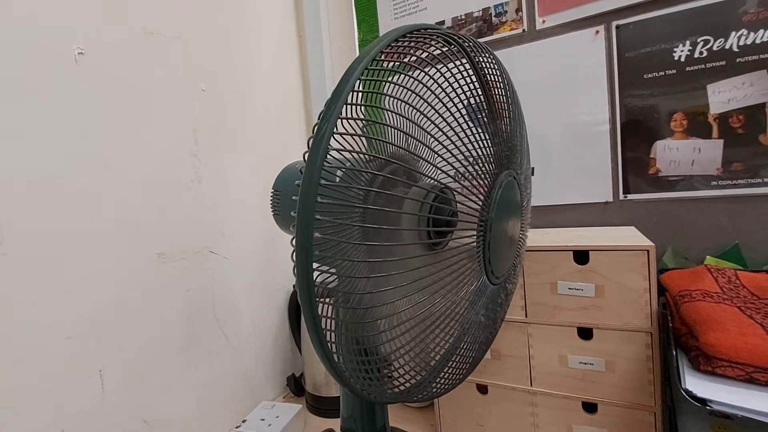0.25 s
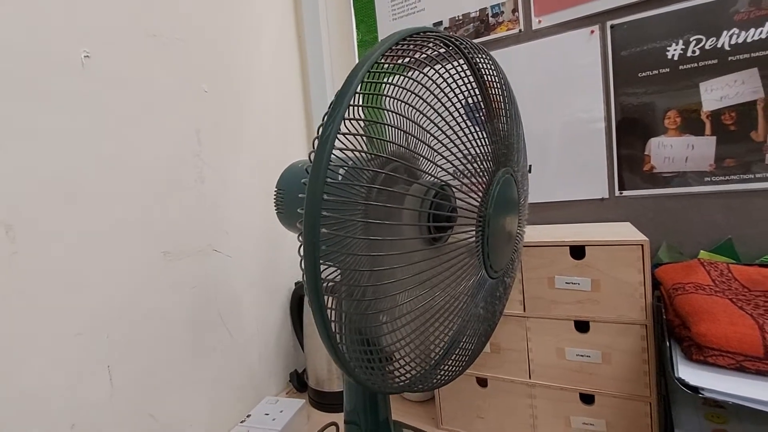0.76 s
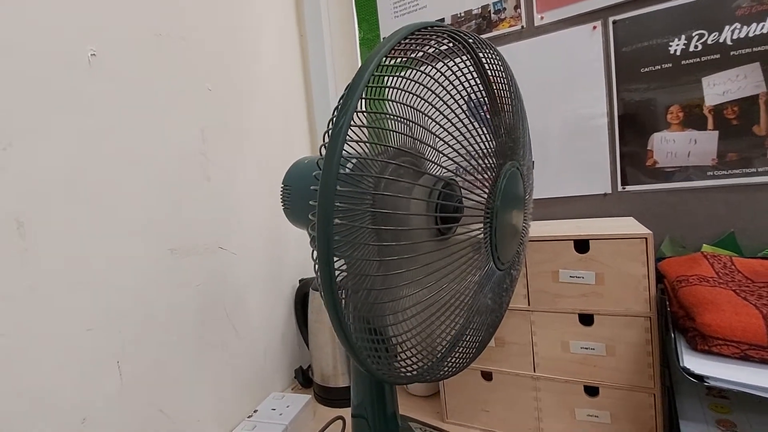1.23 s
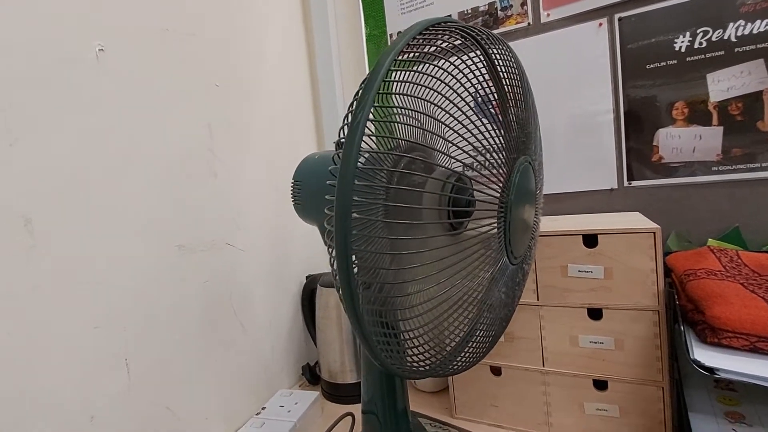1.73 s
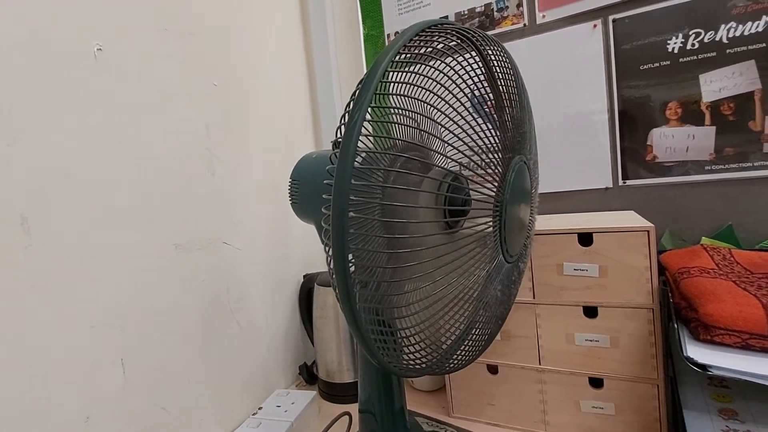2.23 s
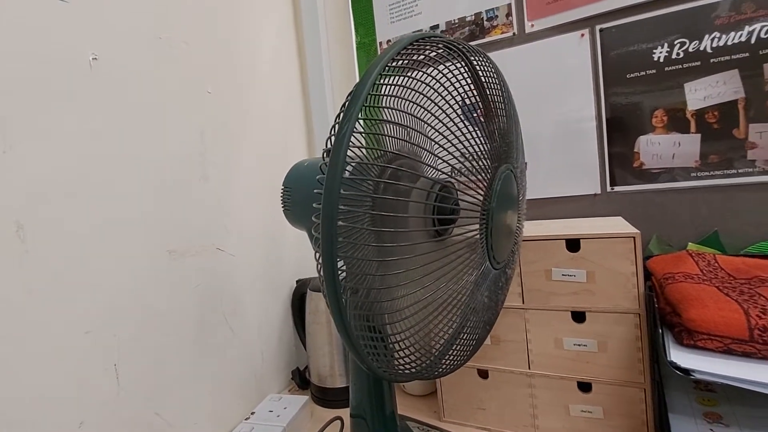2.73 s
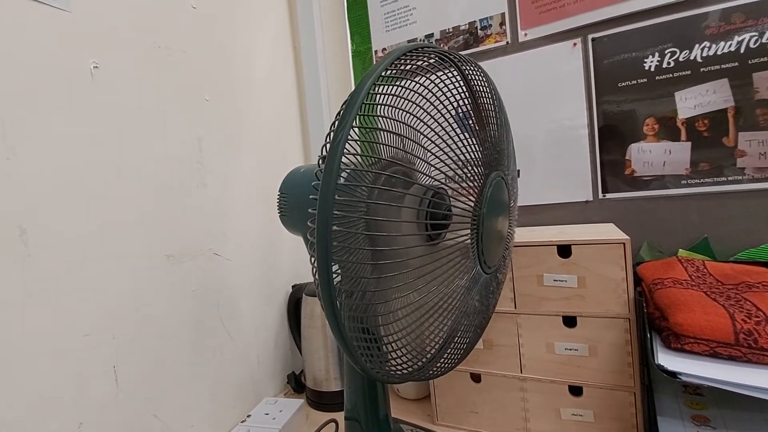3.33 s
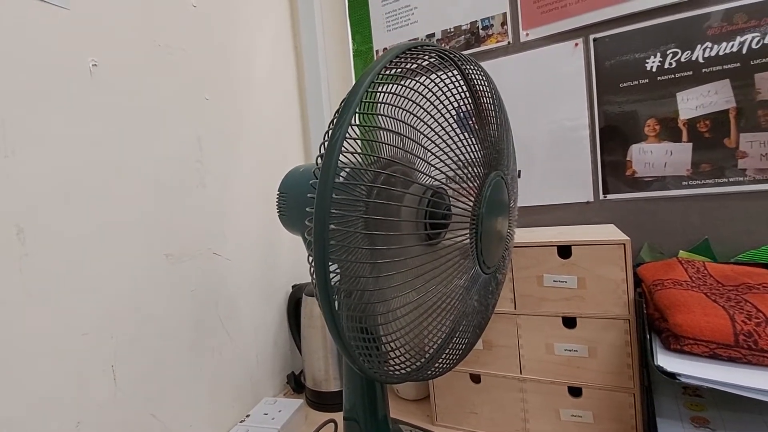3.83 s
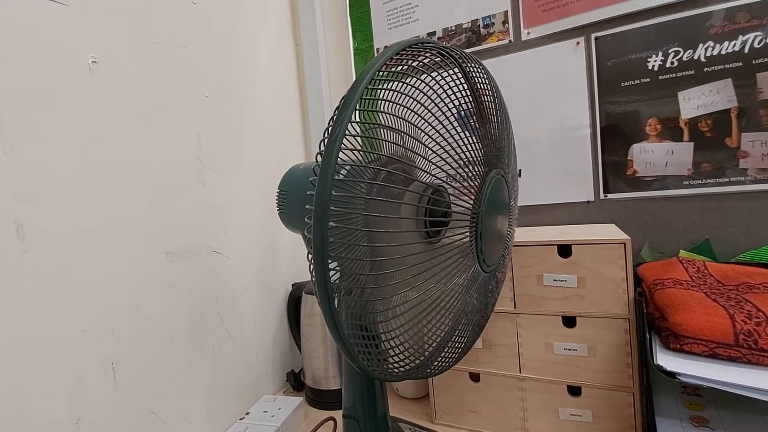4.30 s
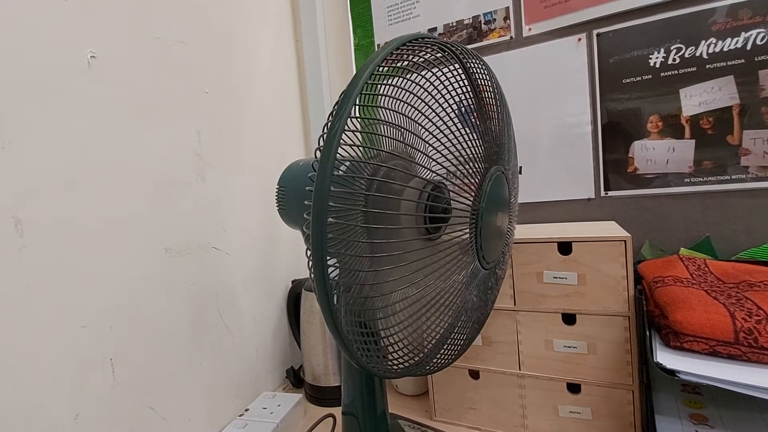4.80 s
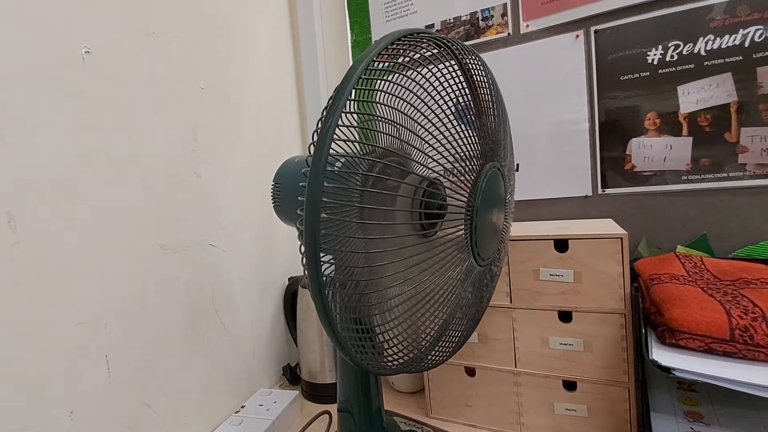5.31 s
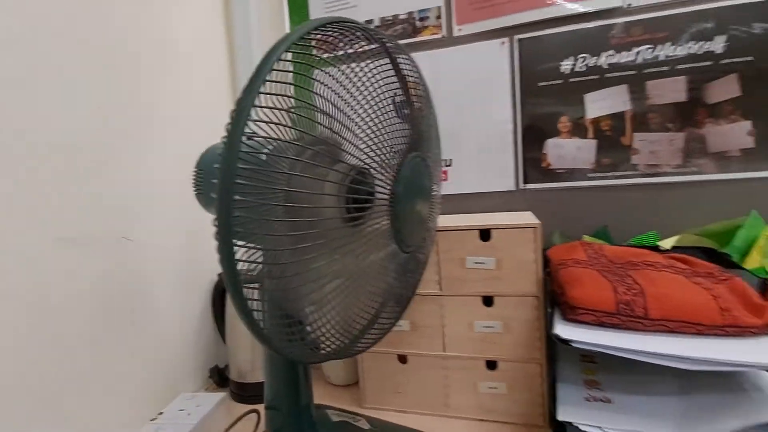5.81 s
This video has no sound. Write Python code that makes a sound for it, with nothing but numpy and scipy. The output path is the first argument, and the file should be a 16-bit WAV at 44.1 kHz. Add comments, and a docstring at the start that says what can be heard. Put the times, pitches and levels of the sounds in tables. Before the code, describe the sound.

A table fan runs continuously at high speed, close to a stereo microphone in a classroom. From 0 to 1 s the blade drone, motor hum, low boom and air rush swell from somewhat quieter to full level. The drone is deep, near 60 Hz with wavering overtones up to about 240 Hz, over a steady 100 Hz hum. Irregular soft bass surges near 90 Hz crowd roughly 0.8 to 2.8 s, then return at about 3.8 s and more weakly until 5 s. Over this lies an even, breathy rush through the wire guard, strongest in the low mids and up to 2 kHz, with gentle treble, faint whistles and slight flutter. The drone steps forward near 1.4 s, dips around 3 s, rises near 4 s, settles, then rises again near 5.9 s as the rush eases by 6 s. The fan never stops.

```python
"""A three-bladed table fan runs at high speed in a classroom, heard close up in stereo.
Drone, hum, boom and rush swell in during the first second; low surges crowd the first three seconds.
Then the fan runs on, its blade drone leaning forward near 1.4 s, 4 s and the end as the rush eases.
Wavering tones make the blade drone, motor hum and faint whistles; a narrow tone swinging in level makes
the boom; coloured noise makes the flutter of the wake and the rush through the wire guard."""
import sys
import numpy as np
from scipy import signal
from scipy.fft import irfft
from scipy.io import wavfile

SR = 44100
rng = np.random.default_rng(int(sys.argv[2]) if len(sys.argv) > 2 else 0)


def dump(signal):
    """Clip the signal to [-1, 1] and save it as 16-bit WAV at the path in sys.argv[1]."""
    limited = np.clip(np.atleast_2d(signal).T, -1, 1)
    pcm = np.round(limited * 32767).astype(np.int16)
    wavfile.write(sys.argv[1], SR, pcm)


N = 266849
TIME = np.arange(N) / SR  # seconds
FREQS = np.fft.rfftfreq(N, 1 / SR)  # Hz

BLADE_HZ, MAINS_HZ, BOOM_HZ = 60.9, 50, 89.5
TREBLE_EDGE_HZ = 15720
SURGE_S = 0.039  # time a surge takes to fall to about a third of its peak
BOOM_DB = -47.5  # level of the boom between surges, once swelled in
LOW_START_DB, LOW_RISE_S = -8, 0.66  # boom and wake start this far down and rise evenly in dB
GUARD_FOLLOWS, BODY_FOLLOWS = 0.58, 0.76  # dB of swell for each dB of the hiss

# Motor hum. Each row: multiple of the mains frequency, level in dB before the rush curve.
MOTOR_HUM = [(2, -46.5), (4, -59.5)]
# Strongest surges of the low boom. Each row: time of the peak in seconds, peak level in dB.
BOOM_SURGES = [(0.79, -36), (0.93, -35.5), (1.17, -36.5), (1.31, -34), (1.48, -36), (1.78, -34.5),
               (2.03, -37.5), (2.21, -36), (2.43, -37), (2.82, -37), (3.78, -35.5), (4.16, -39.5),
               (4.5, -38), (4.85, -39), (5.01, -39.5)]
# Low resonances where the wake flutters. Each row: centre in Hz, width in Hz, relative level in dB.
WAKE_FLUTTER = [(78.8, 2.7, 5), (107.7, 3.4, 0), (191.6, 2.9, -9.5), (214.6, 15, -2), (227.1, 16, 1),
                (272.5, 12, -3), (305, 25, -9.5)]
# Faint narrow whistles of guard and motor. Each row: frequency in Hz, level in dB before the swell.
FAINT_WHISTLES = [(404.3, -67.5), (420.7, -67.5), (490.7, -67.5), (707.3, -66.5), (735.6, -71.5),
                  (914.6, -69)]
# Colour of the dull body of the rush. Each row: frequency in Hz, relative level in dB per Hz.
BODY_COLOUR = [(22, -9.5), (37, -18), (52, 3.5), (70, -11), (112, 3.5), (136, 1), (166, -3.5), (242, -11.5),
               (332, -6.5), (402, -8.5), (478, -13.5), (562, -24.5), (805, -17.5), (1490, -64)]
# Colour of the hiss of the rush. Each row: frequency in Hz, relative level in dB per Hz.
HISS_COLOUR = [(335, -24), (628, -4.4), (1302, -2.4), (1407, -8), (1532, -4), (2090, -5), (2500, -11.3),
               (2960, -16.2), (4100, -19.4), (5420, -22.5), (6220, -25.6), (7370, -26), (7870, -30.3),
               (11380, -30.5), (11920, -33.6), (15660, -37.8)]
# Broad and narrow resonances of the rush in the guard. Each row: centre in Hz, width in Hz,
# relative level in dB.
GUARD_RESONANCES = [(682, 186, 1), (1180, 170, -3.5), (1684, 200, -4), (1932, 23, -3), (1930, 79, -11.5)]
# Stereo balance. Each row: frequency in Hz, left minus right in dB.
STEREO_TILT = [(42, 10), (60.8, 8), (91, 0.7), (121, -3.5), (186, 9.5), (232, -2.5), (282, -4.5),
               (405, 0.7), (910, -1.7), (1160, -3.5), (1560, -6.5), (2020, -6.5), (3020, 1), (4600, -0.5),
               (6900, -2.5), (8100, -1)]
# Likeness of the two channels. Each row: frequency in Hz, correlation from -1 to 1.
STEREO_LIKENESS = [(62, .94), (310, .91), (525, .69), (790, .83), (1010, .31), (1235, .71), (1560, .02),
                   (1960, .55), (2620, .21), (3120, -.12), (6000, .01)]
# Swell of the rush about its usual level. Each row: time in seconds, level in dB.
RUSH_CURVE = [(0, -4), (0.25, -5), (0.72, -2.5), (0.93, -0.5), (1.45, 0.2), (1.9, -0.4), (2.75, 0.5),
              (3.15, -0.8), (4.0, 0), (5.65, 0), (6.05, -2)]
# Swell of the blade drone about its usual level. Each row: time in seconds, level in dB.
DRONE_CURVE = [(0, -12), (0.35, -4), (1.0, -0.5), (1.38, 3), (1.65, 0.5), (2.8, -1), (3.05, -2.5),
               (3.7, -1), (4.05, 3.5), (4.5, 0), (5.4, -0.5), (5.9, 2.5)]
# Blade drone. Each row: multiple of the blade rate, level in dB before the drone curve,
# line width in Hz, strength of the part scattered by eddies (steady part = 1).
BLADE_HARMONICS = [(1, -46.0, 7.8, 0.082), (2, -43.5, 3.8, 0.24), (3, -52, 2.7, 0.73),
                   (4, -49.5, 2.6, 0.58)]


def amp(db):
    """Decibels to gain."""
    return 10 ** (np.asarray(db) / 20)


def unit(x):
    """Scales to an rms of one."""
    return x / np.sqrt(np.mean(abs(x) ** 2) + 1e-20)


def along(rows):
    """A level curve as a gain, sample by sample."""
    return amp(np.interp(TIME, *np.transpose(rows)))


def across(points, hz=FREQS):
    """Reads a table on a logarithmic frequency axis."""
    table_hz, value = np.transpose(points)
    return np.interp(np.log(hz + 1), np.log(table_hz + 1), value)


def resonances(modes):
    """Gain of a set of steep-sided resonances, their powers added."""
    power = 0
    for hz, width_hz, db in modes:
        power = power + amp(db) ** 2 / (1 + ((FREQS - hz) / width_hz) ** 2) ** 2
    return np.sqrt(power)


def sides(hz):
    """Left and right gain at each frequency."""
    tilt_db = across(STEREO_TILT, np.atleast_1d(hz))
    return amp([tilt_db / 2, -tilt_db / 2])


def turbulence(gain):
    """Stereo noise of a given colour: much alike in both channels in the bass, diffuse in the treble."""
    a, b = np.exp(2j * np.pi * rng.random((2, len(FREQS))))
    same = np.clip(across(STEREO_LIKENESS), -.99, .99)
    mid = a * np.sqrt(1 + same)
    side = b * np.sqrt(1 - same)
    spectrum = np.array([mid + side, mid - side]) * sides(FREQS) * gain
    noise = irfft(spectrum, N)
    return noise / noise.mean(0).std()  # the mono mix has an rms of one


def wander(rate_hz):
    """Slow random motion with an rms of one, mostly below the given rate."""
    phases = np.exp(2j * np.pi * rng.random(len(FREQS)))
    lowpass = (FREQS > 0) / (1 + (FREQS / rate_hz) ** 4)
    return unit(irfft(phases * lowpass, N))


def tone(hz, width_hz, scatter):
    """A line of rms one before the stereo tilt: a steady part plus a randomly wavering part."""
    swing = unit(1 + scatter * (wander(width_hz) + 1j * wander(width_hz)))
    carrier = np.exp(2j * np.pi * (hz * TIME + rng.random()))
    return np.sqrt(2) * sides(hz) * (swing * carrier).real


def motor():
    """The iron core hums at even multiples of the mains."""
    return sum(amp(db) * tone(k * MAINS_HZ, width_hz=0.8, scatter=0.013) for k, db in MOTOR_HUM)


def boom():
    """A narrow low boom, perhaps another fan or the shaft, swings in level with surges."""
    surge = sum(amp(db) * np.exp(-((TIME - s) / SURGE_S) ** 2) for s, db in BOOM_SURGES)
    level = np.hypot(amp(BOOM_DB) * wander(4.9), surge)
    return level * tone(BOOM_HZ, width_hz=2.6, scatter=0.13)


def wake():
    """The wake of the blades flutters as noise in low resonances."""
    return amp(-44.0) * turbulence(resonances(WAKE_FLUTTER))


def air(stream):
    """Air tears through the wire guard, pulsing slightly at the blade rate; dull parts swell less than hiss."""
    pulse = 1 + 0.027 * np.cos(2 * np.pi * BLADE_HZ * TIME)
    eddies = amp(.24 * wander(14))  # flicker of 0.24 dB rms
    hiss = amp(-51.5) * stream * turbulence(amp(across(HISS_COLOUR)))
    guard = amp(-52.0) * stream ** GUARD_FOLLOWS * turbulence(resonances(GUARD_RESONANCES))
    body = amp(-45.5) * turbulence(amp(across(BODY_COLOUR)))
    whistles = sum(amp(db) * tone(hz, width_hz=3.1, scatter=0.75) for hz, db in FAINT_WHISTLES)
    return (hiss + guard) * pulse * eddies + stream ** BODY_FOLLOWS * (body + whistles)


def blades():
    """Each passing blade pushes a pressure pulse; eddies make its harmonics waver, the upper ones most."""
    drone = 0
    for k, db, width_hz, scatter in BLADE_HARMONICS:
        drone = drone + amp(db) * tone(k * BLADE_HZ, width_hz, scatter)
    return along(DRONE_CURVE) * drone


def scene():
    """Layers hum, boom, wake, rush and drone; the hum follows the swell of the rush."""
    stream = along(RUSH_CURVE)
    low_swell = amp(LOW_START_DB * np.maximum(1 - TIME / LOW_RISE_S, 0))
    return stream * motor() + low_swell * (boom() + wake()) + air(stream) + blades()


def record(dry):
    """Softens the very ends, then cuts the treble above the edge with a steep low-pass."""
    ends = signal.windows.tukey(N, .0006)
    lowpass = signal.firwin(1023, TREBLE_EDGE_HZ, window=("kaiser", 9), fs=SR)
    return signal.oaconvolve(dry * ends, lowpass[None], "same")


dry = scene()
out = record(dry)
dump(out)
```